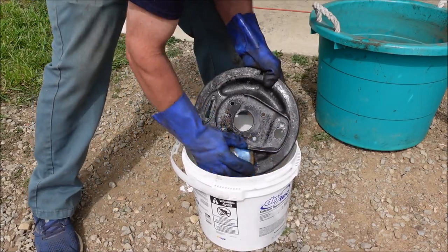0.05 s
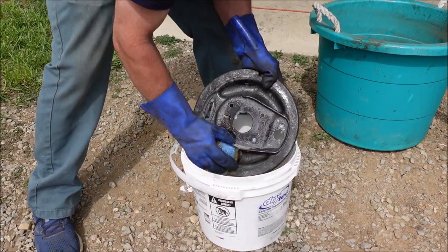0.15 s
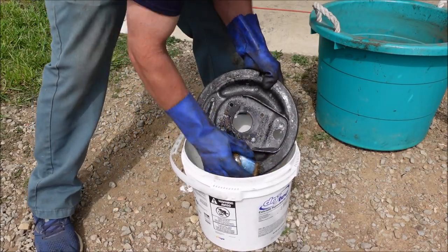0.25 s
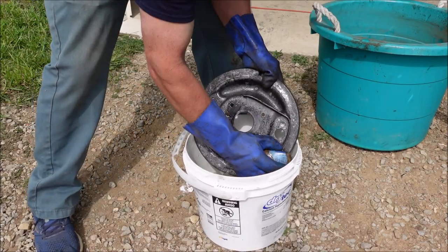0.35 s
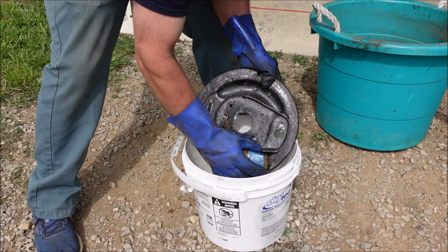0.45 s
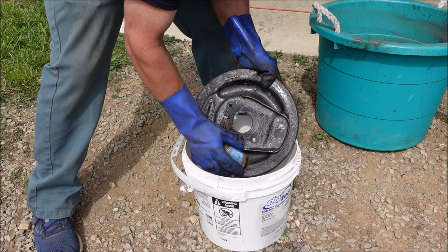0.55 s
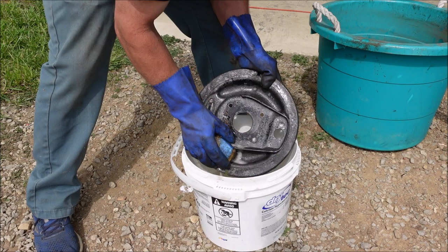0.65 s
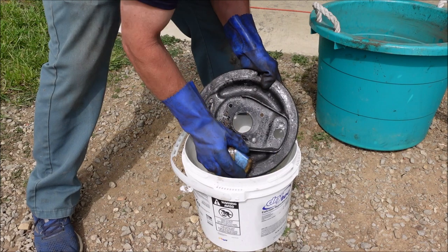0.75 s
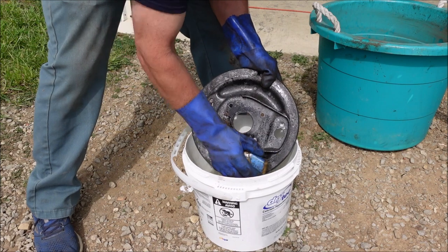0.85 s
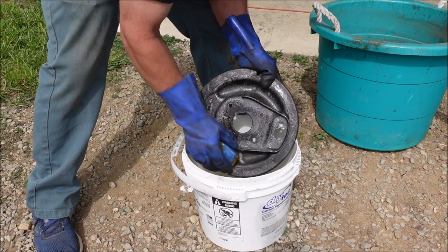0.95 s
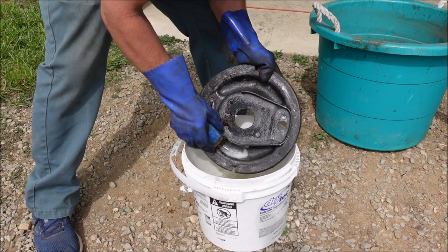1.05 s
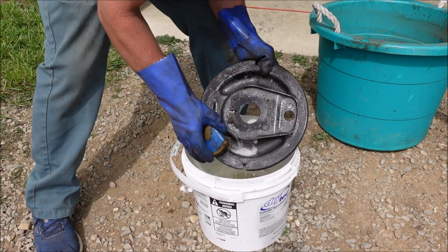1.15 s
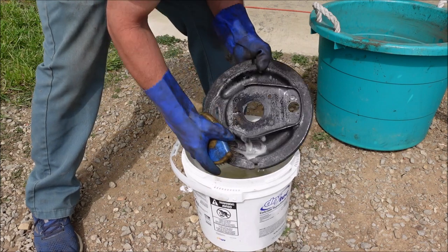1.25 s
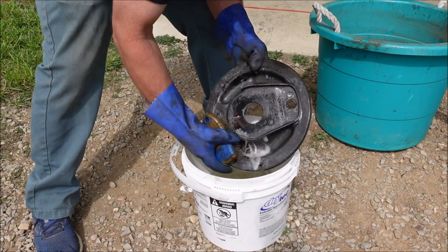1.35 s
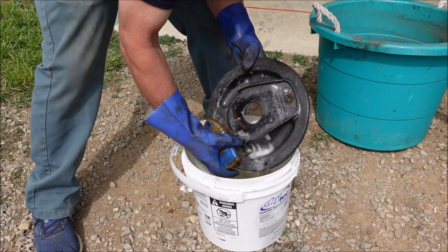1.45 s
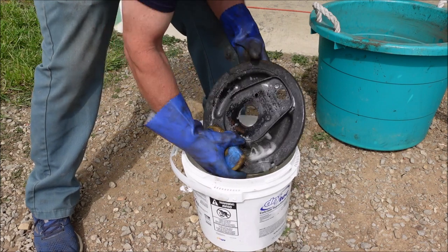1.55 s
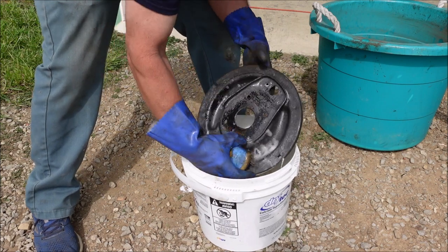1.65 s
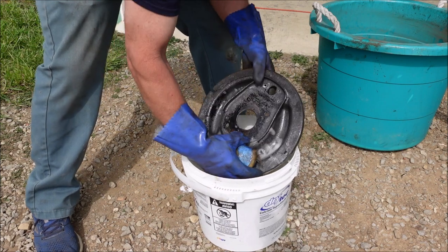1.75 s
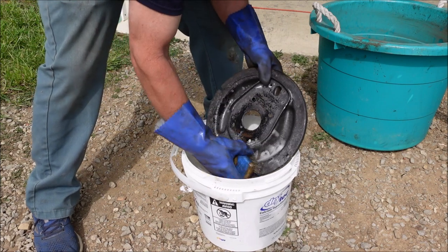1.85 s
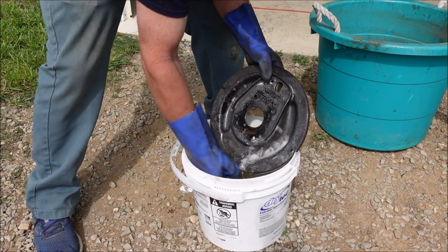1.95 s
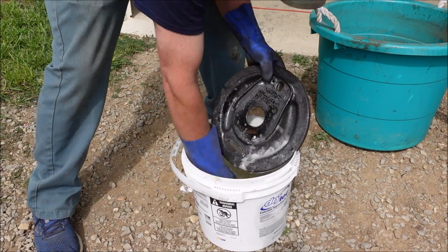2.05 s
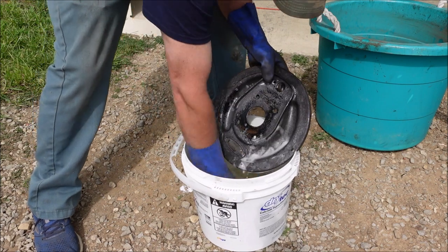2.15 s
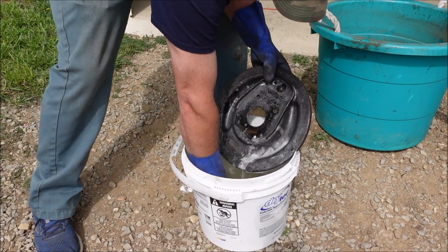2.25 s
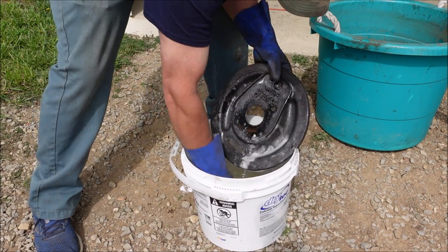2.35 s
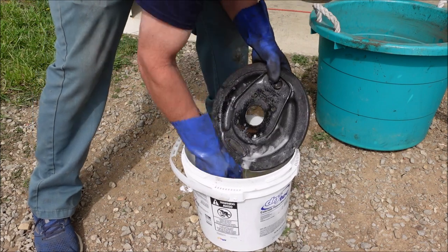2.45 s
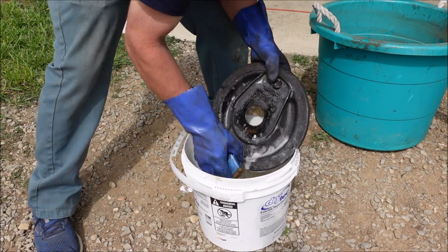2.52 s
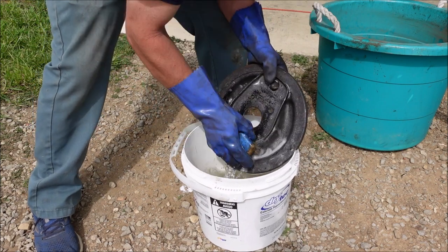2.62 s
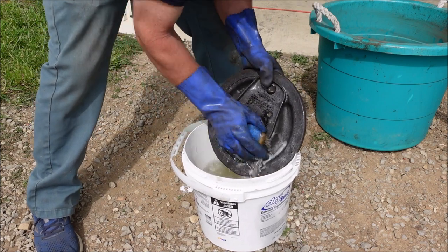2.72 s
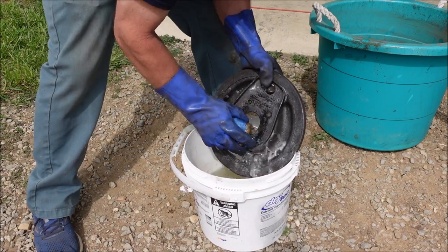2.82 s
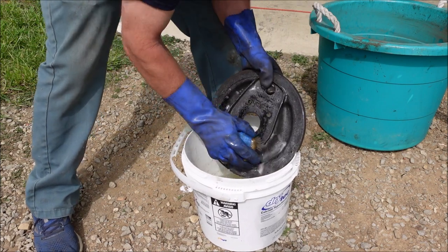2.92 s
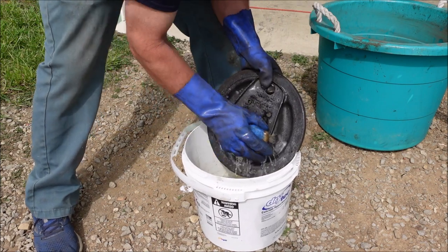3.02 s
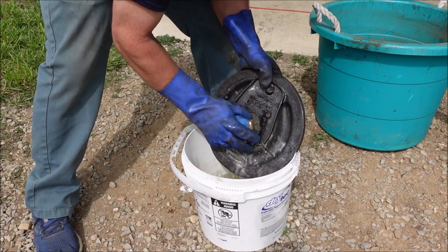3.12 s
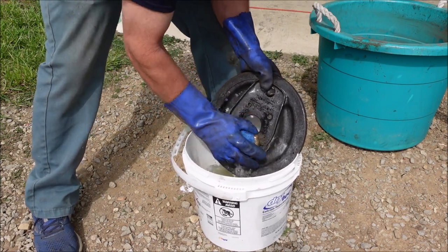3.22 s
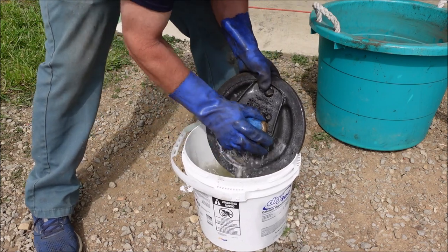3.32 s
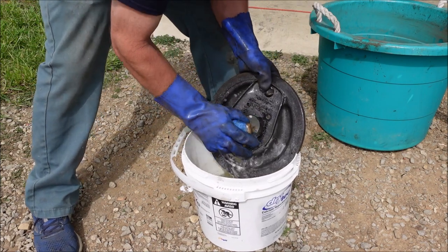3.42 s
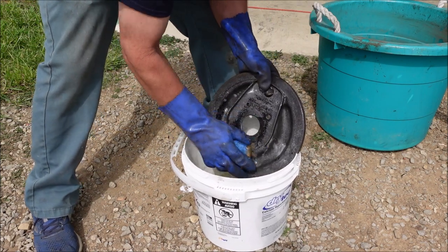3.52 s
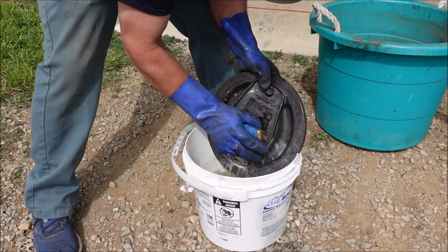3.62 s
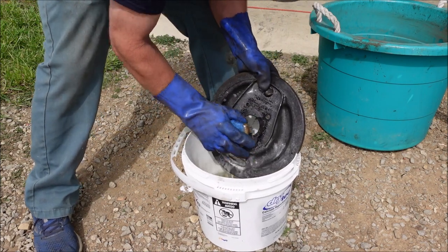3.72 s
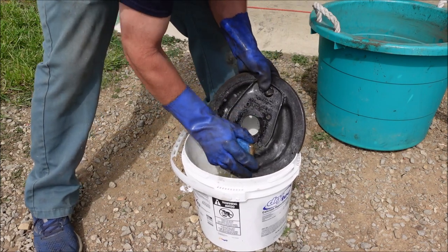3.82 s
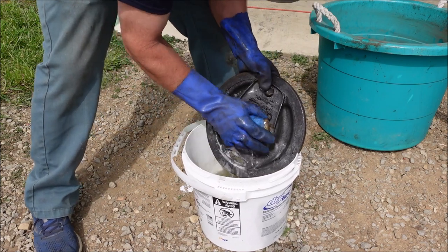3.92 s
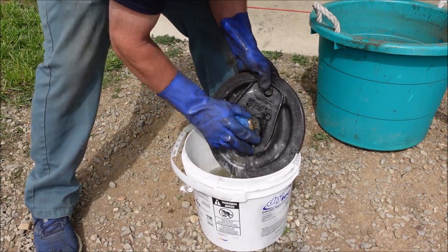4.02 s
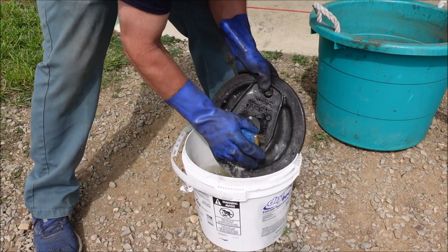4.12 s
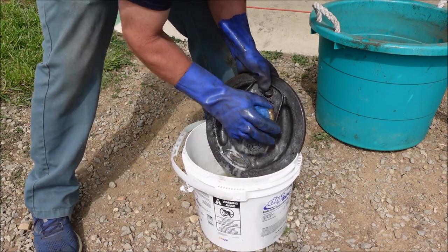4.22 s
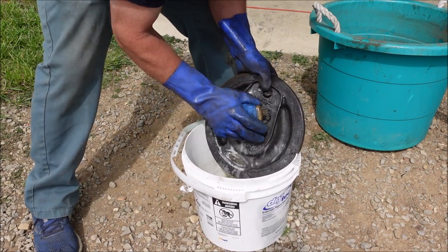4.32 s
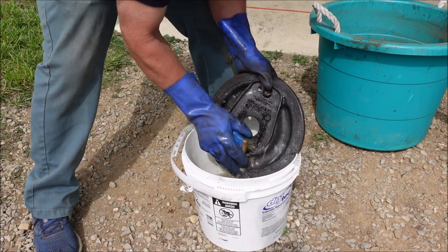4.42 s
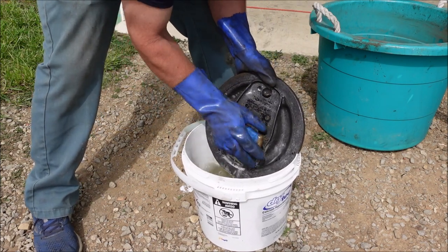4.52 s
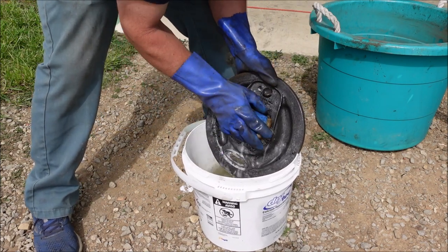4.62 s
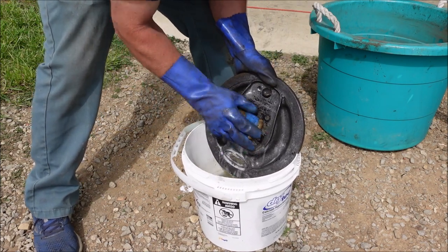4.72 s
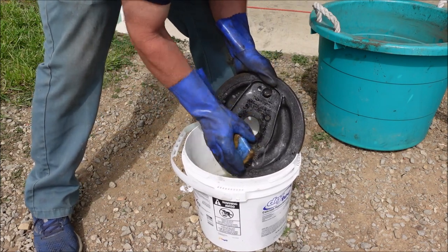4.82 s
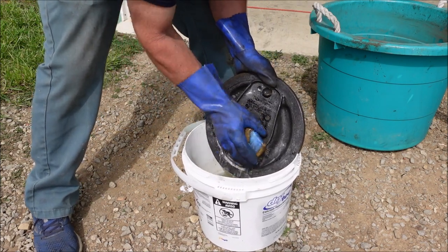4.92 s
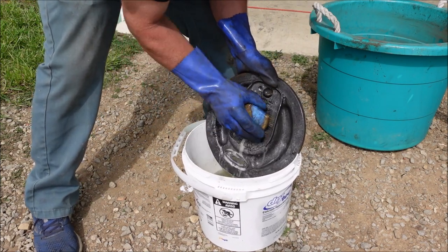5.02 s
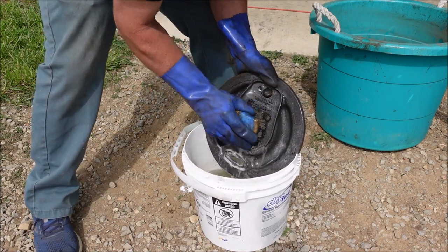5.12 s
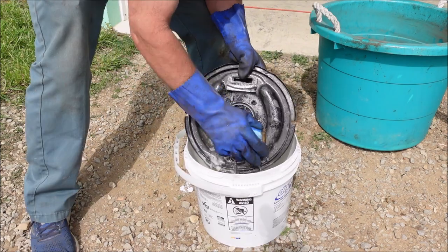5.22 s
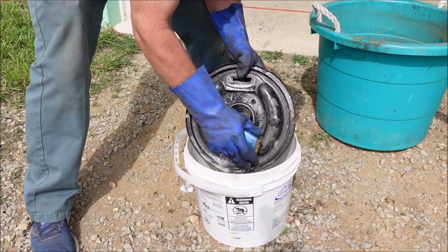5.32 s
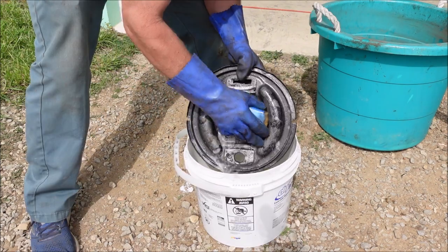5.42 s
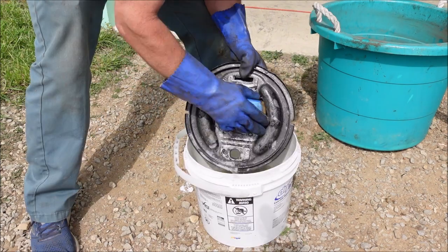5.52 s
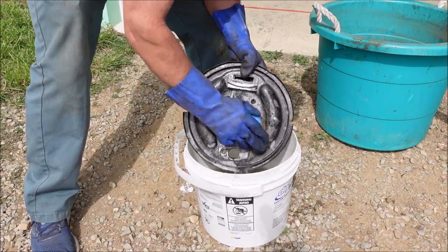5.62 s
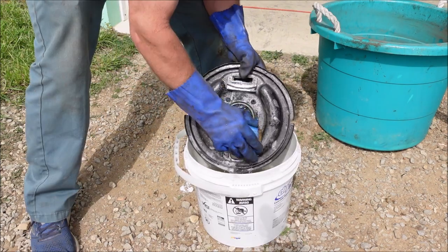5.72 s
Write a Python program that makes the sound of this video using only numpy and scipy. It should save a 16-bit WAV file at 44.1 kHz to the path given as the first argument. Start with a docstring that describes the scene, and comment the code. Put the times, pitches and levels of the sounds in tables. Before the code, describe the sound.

In an open yard, close and nearly dry, bristles swish over hand-held steel while low gusts thump the microphone at first. Metallic clonks punctuate the strokes. After a quieter moment, water churns and splashes brightly, followed by long even scrubs. A soft light stroke, a knock, a split-second dropout and plopping bubbles close it. Drips run throughout.

```python
"""Outdoors on gravel, gloved hands scrub a wet steel brake plate with a stiff brush over a plastic bucket.
From the start gusts buffet the microphone, bristles hiss and make the plate drum; brush, plate and rim knock.
The strokes lighten, then the brush is dunked: stirred bubbles, splashes and spray, as drips go on throughout.
Steady scrubbing returns and a light stroke rasps; near the end the sound drops out for an instant,
then water sloshes against the bucket wall and bubbles plop. Every stroke swells and fades by one rule."""
import sys
import numpy as np
from scipy import signal
from scipy.fft import rfft, irfft, next_fast_len
from scipy.io import wavfile
from scipy.ndimage import uniform_filter1d, map_coordinates

SR = 44100
rng = np.random.default_rng(int(sys.argv[2]) if len(sys.argv) > 2 else 0)


def transcribe(u):
    """Save the signal u as a 16-bit wav file named by the first command-line argument.

    u: samples, shape (n,) or (channels, n), limited to [-1, 1]; the rate is SR.
    q: integer samples, one column per channel.
    """
    v = np.clip(np.atleast_2d(u).T, -1, 1)
    q = np.round(v * 32767).astype(np.int16)
    wavfile.write(sys.argv[1], SR, q)


N = 254016

# Levels in these tables come before the trims in the functions. A t60 is the time to die away by 60 dB.
# Gusts on the microphone. Each row: peak in seconds, swelling in s, fading in s, buffeting in dB.
GUSTS = [(.05, .2, 0.2, -26.5), (.34, 0.44, .12, -27), (.72, 0.37, 0.18, -40.5), (1.15, .06, 0.086, -45),
         (1.28, .08, 0.05, -43.5), (2.45, 0.25, .12, -52), (3.03, 0.085, 0.055, -46), (3.24, .05, .12, -45),
         (3.97, .035, 0.094, -41), (4.14, 0.088, 0.08, -45), (5.55, 0.15, 0.098, -42.5),
         (5.74, .12, .1, -44)]
BREEZE_DB = -55.5  # buffeting between the gusts
# Spectra of the wind's low rumble, its higher flutter and the hush of the yard.
# Each row: frequency in Hz, relative density in dB per Hz.
RUMBLE_SPECTRUM = [(12, -28), (28, 3.5), (45, 0.5), (68, 0), (100, -5), (135, -6), (180, -22), (300, -60),
                   (1000, -77)]
FLUTTER_SPECTRUM = [(30, -32), (85, 9), (145, -14), (200, -5.5), (400, -41), (1000, -80)]
YARD_SPECTRUM = [(20, -3), (100, 0), (250, -4.5), (800, -6.5), (2000, -9), (5000, -17), (16000, -121)]
# Echo decay off bucket, ground and house wall. Each row: frequency in Hz, t60 in seconds.
WALL_DECAY = [(200, 0.24), (1500, 0.1), (10000, 0.048)]

# The brush stirs the water. Each row: time in seconds, churning in dB.
DUNK = [(1.83, -34), (1.916, -38.5), (2.03, -42.5), (2.32, -35.5), (2.51, -31), (2.7, -27)]
CHURN_DB = 2  # lifts the whole churning curve
MIST_DB, MIST_DB_PER_S = -25, 9.5  # fine spray at the end of the dunk; its build-up over the last second
# Water sloshes against the bucket wall. Each row: peak in seconds, swelling in s, fading in s, level in dB.
SLOSH = [(5.57, 0.27, 0.34, -40.5)]
# Spectrum of the slosh. Each row: frequency in Hz, relative density in dB per Hz.
SLOSH_SPECTRUM = [(60, -20), (140, -4), (320, 8), (420, -1), (600, 4), (1200, -9), (3000, -28)]
# Splashes. Each row: start in seconds, level in dB, typical bubble pitch in Hz, length of the cluster in s.
SPLASHES = [(1.606, -28, 1215, 0.01), (1.68, -25, 1160, 0.027), (1.939, -25, 1120, 0.021),
            (2.124, -15, 3400, 0.013), (2.142, -8.5, 3600, 0.027), (2.209, -15.5, 3070, .007),
            (2.267, -10.5, 2700, 0.0075), (2.28, -11.5, 2630, 0.0047), (2.323, -15, 2620, .01),
            (2.341, -18, 1620, 0.031), (2.378, -17.5, 2800, 0.036), (2.422, -11.5, 1905, 0.012),
            (2.457, -12, 2010, .022), (2.535, -8.5, 1970, 0.011), (2.584, -11.5, 2390, 0.017),
            (2.602, -13, 1350, 0.013), (2.603, -10.5, 3300, .008), (2.632, -20, 3500, 0.025),
            (5.393, -23, 1160, 0.022), (5.573, -20, 1970, 0.019)]
SPLASH_SPRAY_DB = -32  # spray relative to a splash with 3 kHz bubbles
SPRAY_DB_PER_OCTAVE = 4  # finer splashes throw more
# Single large bubbles. Each row: start in seconds, level in dB, starting pitch in Hz.
BUBBLES = [(1.578, -25.5, 810), (2.16, -19, 680), (2.217, -22, 690), (2.343, -17, 730), (2.373, -13.5, 714),
           (2.426, -11.5, 1140), (2.456, -10.5, 853), (2.547, -10, 800), (2.547, -4.5, 1680),
           (2.605, -11.5, 790), (2.698, -15, 760), (5.33, -13.5, 1190), (5.403, -16, 1110),
           (5.607, -17.5, 1200), (5.743, -20, 1310), (5.75, -17, 744)]
BUBBLE_CYCLES = 29  # t60 of a large bubble, in cycles of its starting pitch

# Knocks of brush, plate and bucket.
# Each row: start in seconds, hard tap in dB, plate ring in dB, bucket thump in dB.
KNOCKS = [(0.124, -5.5, -13, -31), (0.341, -31, -11, -47), (0.413, -31, -13, -26), (0.589, -12.5, -11, -47),
          (0.7, -30, -21.5, -49), (0.999, -11, -11, -34), (1.848, -21, -21, -32), (1.905, -14, -7, -16.5),
          (1.913, -10.5, -32, -24), (1.999, -27, -17.5, -36), (2.048, -23, -13, -25),
          (2.069, -15, -23, -26), (2.253, -25, -16.5, -26), (3.191, -8, -10.5, -11),
          (3.215, -32, -33, -25.5), (3.955, -19.5, -25, -55), (4.333, -14, -23, -47),
          (5.383, -18, -12, -29.5), (5.538, -30, -23, -36)]
# Modes of the hand-held plate resting on the bucket, then of the bucket.
# Each row: frequency in Hz, typical strength in dB, t60 in seconds.
PLATE_MODES = [(517, -27, 0.23), (605, -23, .07), (739.5, -3.5, 0.22), (742.6, 10, 0.081), (967, -12, 0.05),
               (1217, 4.5, 0.082), (1246, 2.5, 0.044), (1510, 7, 0.043), (2350, -19, .04),
               (3330, -2.5, 0.04)]
BUCKET_MODES = [(150, -8, 0.06), (208, -1, 0.08), (258, 0.5, 0.085), (311, 1, 0.085), (503, -6, 0.06)]

# Brush strokes. Each row: moment of top speed in seconds, speeding up in s, slowing down in s,
# bristle hiss in dB, then relative to that hiss: fine spray in dB, soapy swish in dB.
STROKES = [(.03, .07, 0.078, -28, -8, 2), (0.111, .08, 0.027, -25, -8, -1.5),
           (.172, 0.057, 0.031, -30, -7.5, -1), (.237, 0.026, 0.02, -39, -10, 9.5),
           (.285, 0.018, 0.027, -26, -5.5, -16), (0.382, 0.13, 0.034, -24, -7.5, -0.5),
           (0.528, 0.1, 0.14, -23, -8, 1.5), (0.786, 0.08, 0.093, -25.5, -7.5, 3),
           (0.952, 0.058, 0.077, -21.5, -7.5, 2.5), (1.04, 0.031, 0.11, -29, -6, 0),
           (1.235, .03, 0.043, -42.5, -6, 3.5), (1.35, .055, 0.025, -33.5, -10, 1.5),
           (1.48, 0.13, 0.14, -44.5, -7.5, 1), (1.66, .1, 0.1, -49, -8, 4),
           (1.79, 0.053, .025, -48, -2.5, 7), (1.98, 0.026, .065, -38.5, -2.5, 5),
           (2.645, 0.023, 0.036, -27, -13.5, 5.5), (2.82, 0.16, .1, -25, -12.5, 4),
           (2.935, 0.053, 0.068, -21, -11.5, -7), (3.08, 0.23, 0.24, -25, -8, 1.5),
           (3.25, 0.028, 0.19, -23.5, -10, -5), (3.48, 0.14, .12, -22.5, -9, -3.5),
           (3.64, 0.17, 0.077, -23, -8, 1), (3.745, 0.074, 0.11, -21.5, -10.5, -6.5),
           (3.9, 0.15, 0.1, -21.5, -8.5, -3), (4.05, 0.091, 0.1, -22, -10, -2.5),
           (4.155, 0.05, 0.07, -21.5, -5.5, -2.5), (4.2, 0.028, 0.19, -26.5, -7, 0),
           (4.404, 0.11, 0.078, -21, -13.5, -11), (4.532, 0.044, 0.083, -23.5, -7.5, -0.5),
           (4.75, 0.08, 0.063, -37, -6.5, 2), (4.835, 0.033, 0.069, -36.5, -1, 9.5),
           (4.956, 0.074, 0.057, -29.5, -5.5, 2.5), (5.03, 0.11, 0.066, -30, -3, 1),
           (5.145, 0.076, 0.056, -28, -6, 4.5), (5.26, 0.083, 0.031, -25, -4.5, 0.5),
           (5.32, .04, 0.033, -27, -8.5, 0.5), (5.455, .11, 0.074, -26.5, -9, 2),
           (5.58, 0.19, 0.078, -41, -9, 7.5), (5.685, 0.056, 0.048, -25.5, -9.5, -0.5),
           (5.744, 0.017, 0.037, -30.5, -6, -1)]
RESTING_DB = -57  # hiss of the brush between strokes
# One light stroke rasps in a narrow band.
# Each row: moment of top speed in seconds, speeding up in s, slowing down in s, level in dB.
RASP = [(4.72, 0.13, 0.27, -34)]
# Spectra of bristle hiss, fine spray, soapy swish, drumming plate and rasp.
# Each row: frequency in Hz, relative density in dB per Hz.
HISS_SPECTRUM = [(150, -69), (1200, -28), (2200, -9.5), (3100, -2.5), (3500, -0.5), (3900, -2.5),
                 (4900, 0.5), (5600, -2.5), (6500, -12.5), (7600, -18.5), (11000, -23), (16000, -40)]
SPRAY_SPECTRUM = [(3000, -33), (6000, 2), (7500, -0.5), (9200, -2), (12500, -5.5), (14500, -9),
                  (16000, -17)]
SWISH_SPECTRUM = [(300, -39), (1100, -10.5), (1450, -7), (1680, -3.5), (1900, -4), (2300, 0), (2900, -2),
                  (3400, 0), (4200, -9.5), (7000, -53)]
DRUM_SPECTRUM = [(60, -26), (170, -17.5), (310, -7), (410, -16), (500, -4.5), (590, -7), (700, -1),
                 (765, 2.5), (850, -3), (1000, -4.5), (1200, -2.5), (1600, -5.5), (2400, -11.5),
                 (6000, -41)]
RASP_SPECTRUM = [(1300, -34), (2300, -7), (2800, 0), (3400, -9), (5000, -27)]
DRUM_DB, DRUM_GROWS = -25.5, 0.36  # drumming under a hiss of 0 dB; dB it gains per dB of hiss
# The plate drums more freely or less as it is held. Each row: time in seconds, change of drumming in dB.
PLATE_FREEDOM = [(0, 4.5), (1.0, 2.5), (1.25, -3.5), (2.7, -1.5), (3.2, 1), (3.8, -4), (4.5, -4.5),
                 (5.2, -0.5), (5.6, 4.5), (5.76, 2)]

# A swell rises and falls by EDGE_DB in its given times; a roundness of 2 is a bell, more is flatter.
EDGE_DB, ROUNDNESS = 18.5, 2.27
# The sound drops out for an instant. Each row: time in seconds, gain in dB.
DROPOUT = [(5.272, 0), (5.274, -27), (5.293, -20), (5.295, -60), (5.305, -60), (5.307, 0)]
TOP_HZ = 15850  # nothing is kept from here up


def amp(db):
    """Decibels to gain."""
    return 10 ** (np.asarray(db) / 20)


def unit(x):
    """Scale to rms 1."""
    return x / np.sqrt(np.mean(x ** 2) + 1e-20)


def along(points, hz):
    """Read (Hz, value) points on a log axis."""
    f, v = np.transpose(points)
    return np.interp(np.log(hz + 1), np.log(f + 1), v)


def curves(rows):
    """One value per sample for each column after the time."""
    s, *cols = np.transpose(rows)
    return [np.interp(np.arange(N) / SR, s, c) for c in cols]


def during(rows, fade=.03):
    """1 while a table runs, fading to 0 outside it."""
    t = np.arange(N) / SR
    return np.clip(1 + np.minimum(t - rows[0][0], rows[-1][0] - t) / fade, 0, 1)


def swells(rows):
    """Overlapping rounded swells (peak s, rise s, fall s, dB) as one gain per sample."""
    t = np.arange(0, N, 50) / SR  # a coarse time grid is enough
    s, rise, fall, db = np.transpose(rows)[..., None]
    away = np.maximum((s - t) / rise, (t - s) / fall)
    gains = amp(db - EDGE_DB * away ** ROUNDNESS)
    return np.interp(np.arange(N) / SR, t, np.linalg.norm(gains, axis=0))


def wobble(rate):
    """A smooth random curve, rate knots a second."""
    knots = rng.standard_normal(int(N * rate / SR) + 4)
    return map_coordinates(knots, [np.arange(N) * rate / SR])


def filtered(x, response):
    """x times a response of frequency."""
    size = next_fast_len(N + SR // 2)
    return irfft(rfft(x, size) * response(np.fft.rfftfreq(size, 1 / SR)), size)[:N]


def coloured(x, spectrum):
    """x shaped by a spectrum, at rms 1."""
    return unit(filtered(x, lambda hz: amp(along(spectrum, hz))))


def patchy(x, depth_db):
    """Random gain patches in time and frequency, as the contact wanders."""
    z = signal.stft(x, nperseg=512)[2]
    field = uniform_filter1d(rng.standard_normal(z.shape), size=4, axis=0)
    field = uniform_filter1d(field, size=12, axis=1)
    return signal.istft(z * amp(depth_db * unit(field)), nperseg=512)[1][:N]


def flicks(rate, smooth):
    """Random tiny impacts, rate a second, over a share of smooth friction."""
    hits = (rng.random(N) < rate / SR) * rng.standard_normal(N)
    return unit(unit(hits) + smooth * rng.standard_normal(N))


def add(track, s, sound):
    """Mix a sound into the track at time s."""
    start = int(np.clip(round(s * SR), 0, N))
    track[start:start + len(sound)] += sound[:N - start]


def burst(noise, s, t60):
    """The stretch of noise from time s on, dying away."""
    t = np.arange(SR // 4) / SR
    return np.roll(noise, -round(s * SR))[:len(t)] * amp(-60 * t / t60)


def bubble(hz, t60, rise=0.077, attack=0.00042):
    """A damped ring whose pitch climbs as the bubble nears the surface."""
    t = np.arange(SR // 10) / SR
    phase = 2 * np.pi * hz * t * (1 + rise * np.minimum(t / t60, 1) / 2)
    return np.sin(phase) * amp(-60 * t / t60) * (1 - np.exp(-t / attack))


def ring(modes, scatter_db):
    """Struck modes, with new strengths at every blow; peak 1. Little is radiated below the lowest mode."""
    t = np.arange(SR // 4) / SR
    x = np.zeros(len(t))
    for k, (hz, db, t60) in enumerate(modes):
        decay = amp(db + scatter_db * rng.standard_normal() - 60 * t / t60)
        x += (-1) ** k * decay * np.sin(2 * np.pi * hz * t)
    x = signal.sosfilt(signal.butter(2, modes[0][0] / 2, "high", fs=SR, output="sos"), x)
    return x / np.abs(x).max()


def air():
    """Gusts buffet the microphone over the faint hush of the yard; the strong ones reach higher in pitch."""
    buffet = np.hypot(swells(GUSTS), amp(BREEZE_DB))
    turbulence = amp(1.5 * wobble(14))
    rumble = amp(-0.5) * buffet * turbulence * coloured(rng.standard_normal(N), RUMBLE_SPECTRUM)
    # flutter grows faster than the rumble as the wind strengthens
    flutter = amp(11.0) * buffet ** 1.67 * coloured(rng.standard_normal(N), FLUTTER_SPECTRUM)
    hush = amp(-48.0) * coloured(rng.standard_normal(N), YARD_SPECTRUM)
    return rumble + flutter + hush


def echoes(x):
    """The short answer of bucket, ground and house wall: decaying noise, treble dying first."""
    hz, t, z = signal.stft(rng.standard_normal(SR // 4), SR, nperseg=256)
    decay = amp(-60 * t / along(WALL_DECAY, hz)[:, None])
    tail = signal.istft(z * decay, SR, nperseg=256)[1]
    delayed = np.pad(tail / np.linalg.norm(tail), (SR // 400, 0))  # 2.5 ms later
    return signal.fftconvolve(x, delayed)[:N]


def drips(count=70):
    """Wash water trickles off the plate, each drop a small bubble; the suds crackle faintly."""
    track = np.zeros(N)
    for s, pitch, size in rng.random((count, 3)):
        hz = 750 * 4 ** pitch
        drop = bubble(hz, 24 / hz, rise=0.18, attack=0.00026)
        add(track, s * N / SR, amp(-31 - 20 * size) * drop)
    suds = amp(-53) * coloured(flicks(rate=110, smooth=0), HISS_SPECTRUM)
    return track + suds


def churning(count=320):
    """Stirred water: a swarm of small bubbles, a wash on the bucket wall and fine spray; later a slosh."""
    churn_db, = curves(DUNK)
    start, end = DUNK[0][0], DUNK[-1][0]
    swarm = np.zeros(N)
    for s, (pitch, size) in zip(np.linspace(start, end, count), rng.standard_normal((count, 2))):
        # the longer the stirring lasts, the smaller and higher the bubbles
        hz = np.clip(1500 * np.exp(.48 * pitch + .5 * (s - start)), 550, 6000)
        sound = bubble(hz, 42 / hz, rise=0.084, attack=0.0003)
        add(swarm, s + rng.uniform(0, .01), amp(4.6 * np.tanh(size)) * sound)
    swarm = unit(swarm) * np.sqrt(during(DUNK).mean())  # allow for the silence outside the dunk
    wash = coloured(flicks(rate=560, smooth=0.8), DRUM_SPECTRUM)
    mist = coloured(flicks(rate=290, smooth=0.3), SPRAY_SPECTRUM)
    spatter = coloured(patchy(flicks(rate=1600, smooth=0.9), depth_db=3.0), HISS_SPECTRUM)
    build_up_s = np.clip(np.arange(N) / SR - end, -1, 0)
    fine = (mist + amp(15) * spatter) * amp(MIST_DB + MIST_DB_PER_S * build_up_s)
    stirred = amp(-3.5) * swarm + amp(-6.5) * wash + fine
    slosh = swells(SLOSH) * coloured(flicks(rate=300, smooth=.6), SLOSH_SPECTRUM)
    return during(DUNK) * amp(churn_db + CHURN_DB) * stirred + slosh


def splashes(count=16):
    """A splash slaps the surface, throws spray and traps a cluster of bubbles; large ones plop singly."""
    water = np.zeros(N)
    slap = coloured(rng.standard_normal(N), SWISH_SPECTRUM)
    droplets = coloured(flicks(rate=1400, smooth=0.61), SPRAY_SPECTRUM)
    for s, db, pitch_hz, length in SPLASHES:
        add(water, s, amp(db - 21.0) * burst(slap, s, t60=4 * length))
        spray_db = db + SPLASH_SPRAY_DB + SPRAY_DB_PER_OCTAVE * np.log2(pitch_hz / 3000)
        add(water, s, amp(spray_db) * burst(droplets, s, t60=6 * length))
        for delay, (pitch, size) in zip(np.linspace(0, 1, count), rng.standard_normal((count, 2))):
            hz = np.clip(pitch_hz * np.exp(.3 * pitch), 700, 9000)
            level_db = db - 11 - 3 * delay + 4.2 * np.tanh(size)  # early bubbles tend to be stronger
            onset = s + length * (delay + rng.random() / count)
            add(water, onset, amp(level_db) * bubble(hz, 42 / hz, attack=0.000057))
    for s, db, hz in BUBBLES:
        plop = bubble(hz, BUBBLE_CYCLES / hz, rise=0.06, attack=0.00069)
        add(water, s, amp(db - 0.5) * plop)
    return water


def knocks():
    """A hard contact gives one quick push; the plate rings and chatters on the rim, and the bucket thumps."""
    track = np.zeros(N)
    tap = ring([(1064, 0, 0.0055)], scatter_db=0)
    chatter = coloured(rng.standard_normal(N), DRUM_SPECTRUM)
    for s, tap_db, plate_db, thump_db in KNOCKS:
        plate = ring(PLATE_MODES, scatter_db=5.5) + amp(-12) * burst(chatter, s, t60=0.19)
        thump = ring(BUCKET_MODES, scatter_db=3.3)
        add(track, s, amp(tap_db - 2.0) * tap)
        add(track, s, amp(plate_db - 4.0) * plate)
        add(track, s, amp(thump_db - 1.5) * thump)
    return track


def scrubbing():
    """Thousands of bristles flick over wet steel; tufts catch and slip, and the plate drums under them."""
    hiss = coloured(patchy(flicks(rate=14000, smooth=0.69), depth_db=2.5), HISS_SPECTRUM)
    spray = coloured(patchy(flicks(rate=6000, smooth=0.8), depth_db=3.0), SPRAY_SPECTRUM)
    swish = coloured(patchy(flicks(rate=6500, smooth=1.0), depth_db=3.5), SWISH_SPECTRUM)
    drum = coloured(patchy(flicks(rate=1200, smooth=0.84), depth_db=4.5), DRUM_SPECTRUM)
    rasp = coloured(flicks(rate=1800, smooth=0.45), RASP_SPECTRUM)

    s, rise, fall, db, spray_db, swish_db = np.transpose(STROKES)
    resting = amp(RESTING_DB) * (1 - during(DUNK))  # no resting hiss under water
    effort = np.hypot(swells(np.c_[s, rise, fall, db]), resting)
    spray_gain = swells(np.c_[s, rise, fall, db + spray_db])
    swish_gain = np.hypot(swells(np.c_[s, rise, fall, db + swish_db]), amp(2) * resting)
    freedom_db, = curves(PLATE_FREEDOM)

    brush = amp(1.91) * effort * hiss
    brush += swells(RASP) * rasp
    brush += amp(2.37) * spray_gain * spray
    brush += amp(-3.2) * swish_gain * swish
    brush += amp(DRUM_DB + freedom_db) * effort ** DRUM_GROWS * drum
    catch_and_slip = amp(0.99 * wobble(55) + 0.77 * wobble(210))
    return brush * catch_and_slip


def scene():
    """Scrubbing, water and knocks in the open air; only the bucket's sounds, drips and knocks echo."""
    bucket = churning() + splashes() + drips() + knocks()
    return (scrubbing() + bucket + amp(-10.0) * echoes(bucket) + air())[None]


def record(dry):
    """Peaks are rounded off, the sound drops out for an instant, and nothing is kept above the band limit."""
    gain_db, = curves(DROPOUT)
    rounded = dry[0] / (1 + (dry[0] / .45) ** 6) ** (1 / 6)  # levels off towards 0.45
    return filtered(rounded * amp(gain_db), lambda hz: hz < TOP_HZ)[None]


dry = scene()
out = record(dry)
transcribe(out)
```